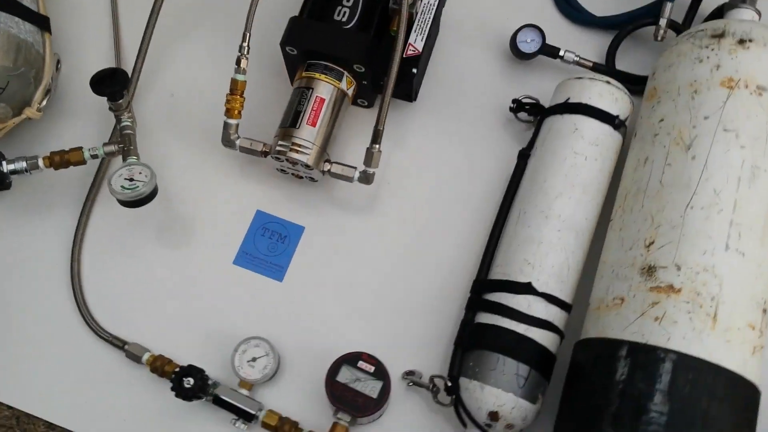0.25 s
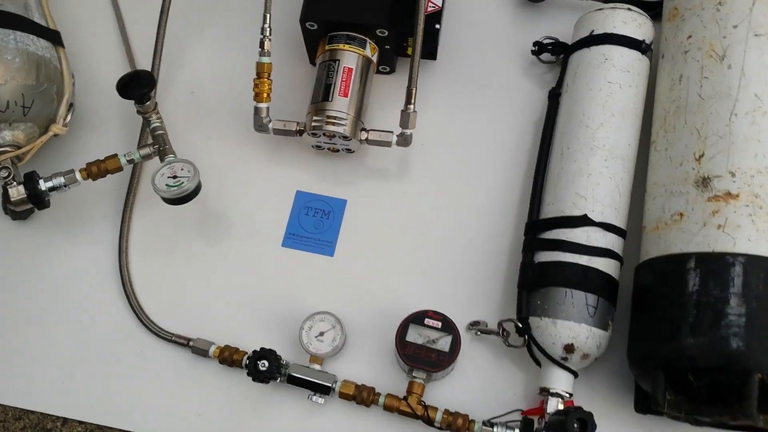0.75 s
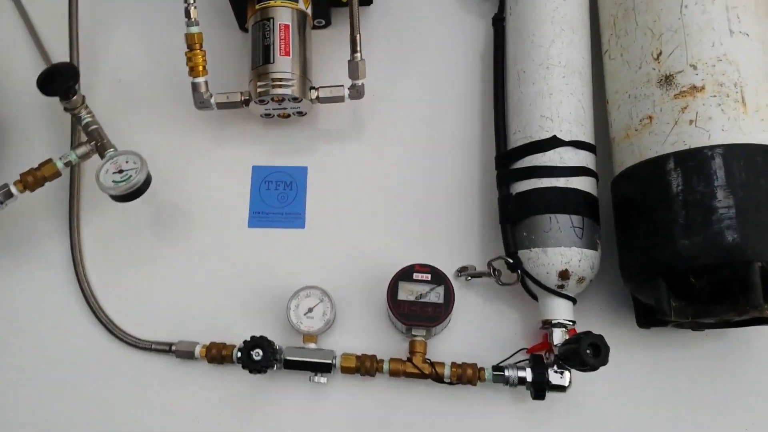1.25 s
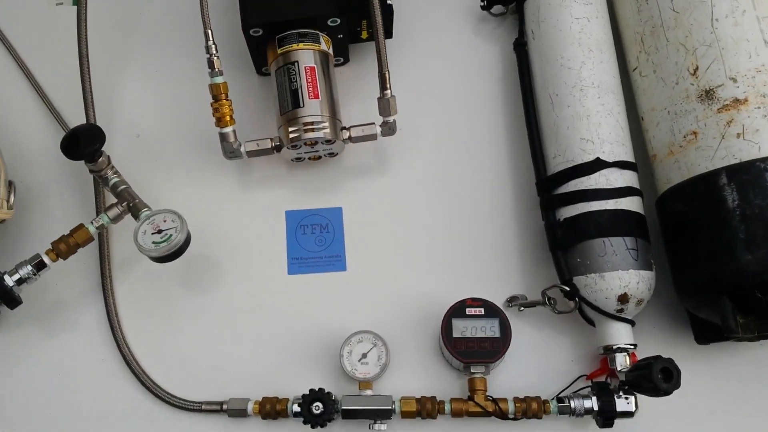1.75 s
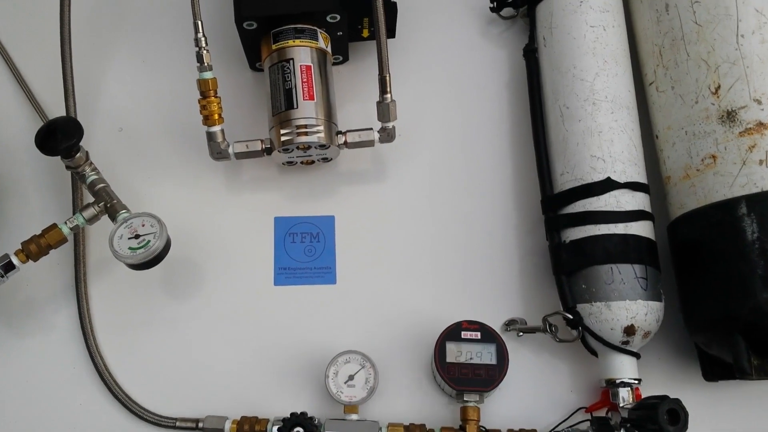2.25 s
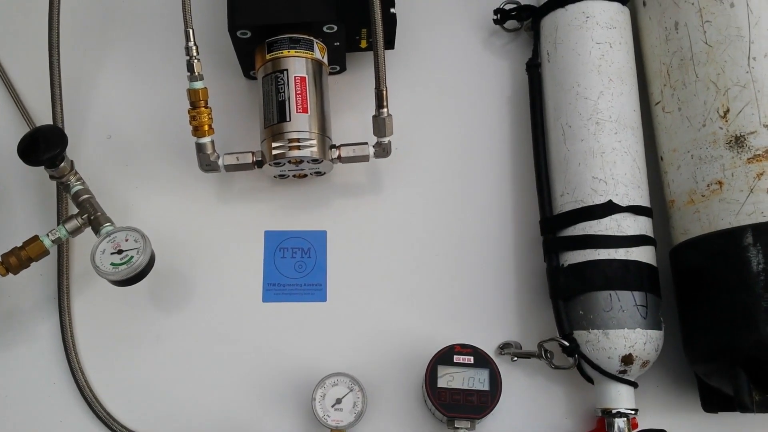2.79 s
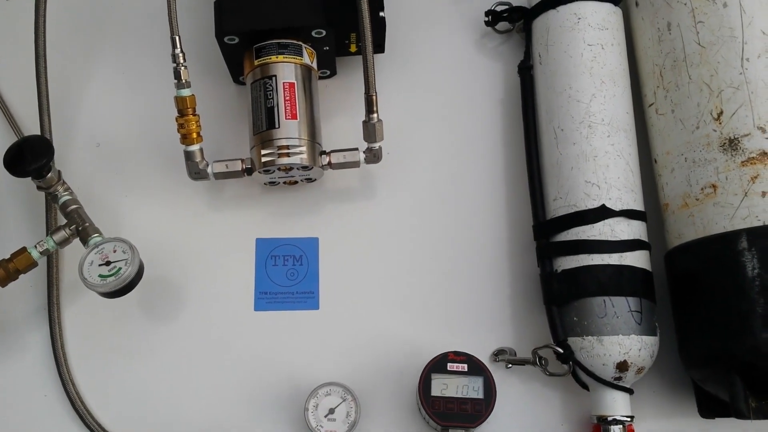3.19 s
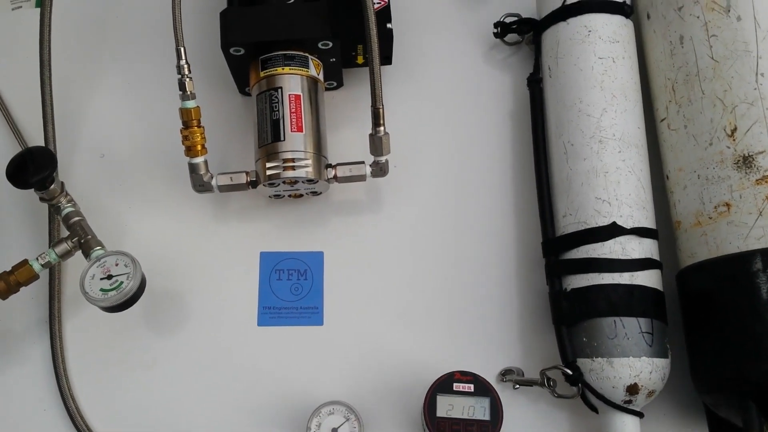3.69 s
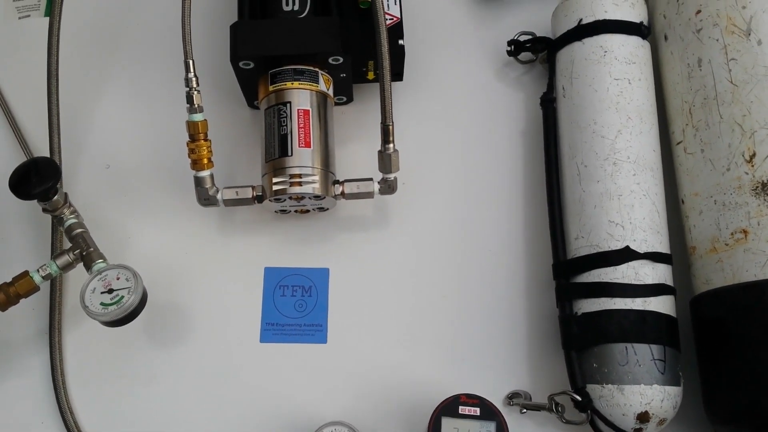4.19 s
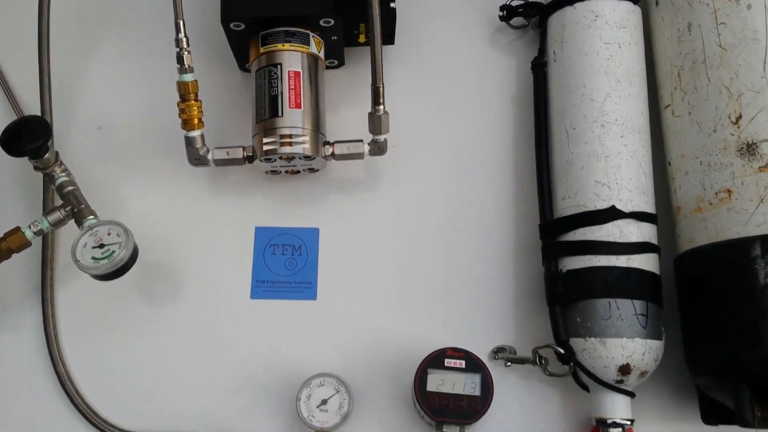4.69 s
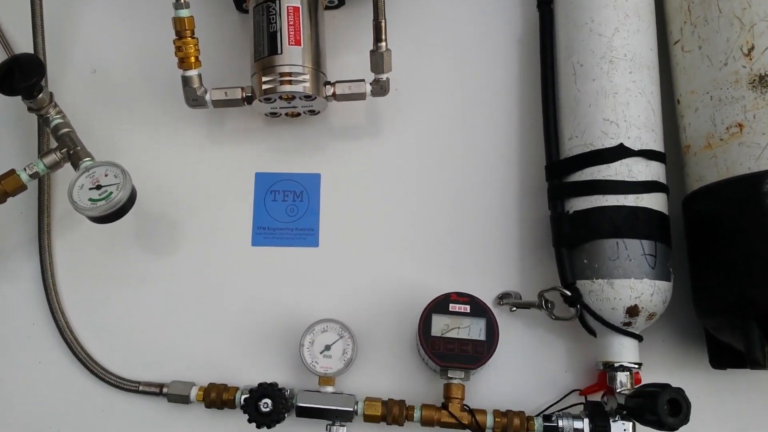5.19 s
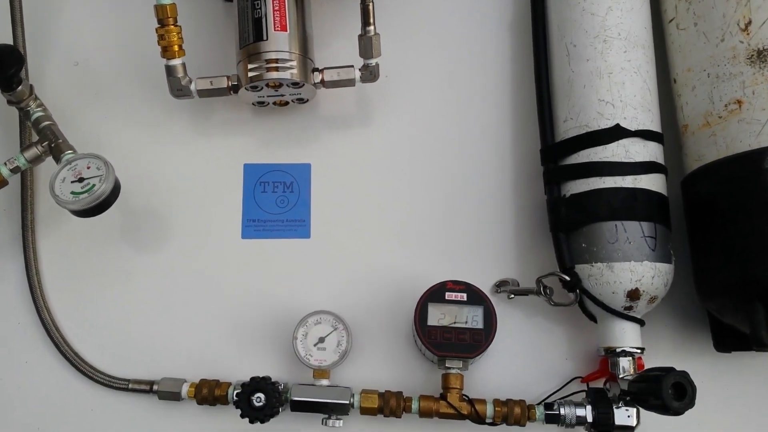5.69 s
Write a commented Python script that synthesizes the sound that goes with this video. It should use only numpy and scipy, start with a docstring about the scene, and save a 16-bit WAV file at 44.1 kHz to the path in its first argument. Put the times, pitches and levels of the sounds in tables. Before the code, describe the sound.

Seven two-part blasts of escaping air, about 0.9 seconds apart, heard close in stereo. A muffler gushes for about 0.15 seconds, the piston lands with a hard crack and tiny bounce, then a crisper puff answers and trails away as narrow, whistly hiss. Between them remain a quiet, high air leak, low background rumble and a faint early hum. Light rustles occur in the first second; little room echo.

```python
"""An air-driven gas booster makes seven strokes on a bench below a hand-held stereo camera.
From the start a fitting leaks shaped hiss over distant rumble; brief band-noise rustles and two faint tones
come early, and a sine hum swells and fades. In each stroke a pilot pin ticks and rings the cylinder, the spool
leaks, slams with a thud and the muffler roars in coloured noise, the piston lands and bounces as cracks, knocks
and thuds, then a sharp puff of noise answers and a narrow-band bleed dies away."""
import sys
import numpy as np
from scipy import signal
from scipy.fft import rfft, irfft, next_fast_len
from scipy.io import wavfile
from scipy.ndimage import uniform_filter1d

SR = 44100
rng = np.random.default_rng(int(sys.argv[2]) if len(sys.argv) > 2 else 0)


def unload_audio(sound):
    """Save the sound as a 16-bit wav file, at the path given as the first command line argument."""
    columns = np.transpose(np.atleast_2d(sound))
    # keep every value between -1 and 1, then stretch to whole-number steps
    steps = np.round(np.clip(columns, -1, 1) * 32767)
    wavfile.write(sys.argv[1], SR, steps.astype(np.int16))


N = 262042
T = np.arange(N) / SR
FFT_LENGTH = next_fast_len(N)
HZ = np.fft.rfftfreq(FFT_LENGTH, 1 / SR)

# Noise colours: pitch_hz, level_db (relative, per Hz)
RUMBLE_COLOUR = [(20, -31), (40, -13), (80, -4.5), (130, -13.5), (220, -16.5), (450, -19), (800, -19.5),
                 (1300, -24.5), (2200, -35), (4000, -50), (6000, -63)]
LEAK_COLOUR = [(880, -44), (1500, -18), (2130, -18.5), (3010, -17), (4810, -15.5), (5110, -9), (5740, -9.5),
               (6460, -5), (7260, -10), (11900, -14.5), (15600, -29)]
SNAP_COLOUR = [(150, -9), (350, -1), (1300, -3), (2000, -13), (3200, -13), (6000, -20), (15600, -40)]
PUFF_COLOUR = [(59, -61.5), (100, -41), (713, -8), (1160, -13), (1430, -4), (1660, -17), (2480, -7.5),
               (3070, -30), (3630, -41), (6160, -8), (7770, 2), (10700, -4), (15600, -12.5)]
BLEED_COLOUR = [(88, -50.5), (150, -22.5), (428, -18.5), (530, -24.5), (608, -20.5), (1300, -15.5),
                (1700, -17), (4160, -6.5), (4590, -2), (5050, -7.5), (5360, -3), (8380, -8.5), (15600, -28)]
CRACK_COLOUR = [(300, -3.5), (1000, -10.5), (3500, 1), (6500, 11.5), (10000, -8), (15600, -14.5)]
KNOCK_COLOUR = [(200, -2), (500, -2), (800, 1), (2000, 0.5), (4000, -6.5), (15600, -40)]
SLIDE_COLOUR = [(150, -6), (400, 2.5), (1200, -6), (2500, -8.5), (5000, -9), (9000, -4), (15600, -22)]
SURGE_COLOUR = [(300, -30), (800, -17.5), (2500, -24), (3500, -12.5), (4500, -5.5), (5050, 3), (5700, -6),
                (9000, -13), (15600, -43)]
VENT_COLOUR = [(35, -71), (60, -34), (216, -16), (522, -19), (1320, -14.5), (1600, -16), (4760, -3),
               (5230, -3), (7410, -1), (8720, -4), (10300, -8.5), (14500, -16), (15600, -20)]
HOLLOW_COLOUR = [(400, -29.5), (650, -10), (750, -2), (880, -4), (1100, -16.5), (1410, -3.5), (1650, -19),
                 (3000, -49)]
# Resonances added to a colour: pitch_hz, width_hz (at half the boost in dB), boost_db
FITTING_PEAKS = [(5060, 170, 2.1), (6370, 390, 4.8), (8200, 610, 5.2), (11400, 200, 1.6), (11370, 430, 5.3)]
NOZZLE_PEAKS = [(6870, 490, 7.1), (8100, 210, 3.1), (9040, 140, 2.4), (10580, 370, 6.3)]
PASSAGE_PEAKS = [(1980, 450, 5.9), (4560, 28, 3.1), (4720, 95, 5.8), (5430, 130, 4.5), (6120, 140, 5.5),
                 (7000, 69, 1.9), (8560, 290, 9.6)]
MUFFLER_PEAKS = [(720, 12, 1.3), (1400, 94, 5.5), (2110, 410, 3), (2560, 93, 2.9), (3180, 170, 5.3),
                 (4690, 170, 6.2), (6000, 190, 3.3), (7230, 220, 1.7), (8770, 290, 4.7)]
# Stereo shading by the camera body: pitch_hz, left_minus_right_db
PUMP_SHADE = [(300, 0), (800, 1), (2500, -0.5), (3500, -1.5), (4700, -4), (6200, 2.5), (7000, -4),
              (8000, -9.5), (9000, -16), (10500, -9.5), (13000, -16.5), (15500, -11)]
LEAK_SHADE = [(500, 3), (4000, 1), (5200, 3.5), (6300, 5.5), (7200, -4), (8200, -11), (10000, -10),
              (12000, -11), (14000, -10)]
# Likeness of the two ports: pitch_hz, correlation (0 to 1)
PORT_LIKENESS = [(30, 1), (150, 0.9), (700, 0.77), (1400, 0.61), (2500, 0.75), (5000, 0.44), (15000, 0.24)]
# Level curves before flutter: time_s, level_db
HUM_CURVE = [(0, -67.5), (.75, -73), (.95, -65.5), (1.5, -62), (2.7, -72), (4.2, -80)]
LEAK_CURVE = [(.15, -51.5), (.95, -55), (1.85, -53.5), (2.75, -57), (3.65, -53.5), (4.55, -57.5),
              (5.5, -57)]
# Rustles and ticks close to the camera: start_s, level_db, length_s, centre_hz, width_octaves
RUSTLES = [(0.035, -56.5, .041, 796, 1.25), (0.045, -49, 0.031, 5200, 1.7), (0.151, -57.5, .005, 1390, 1.2),
           (0.192, -58.5, 0.12, 1100, 2.5), (0.249, -48, 0.037, 5800, 0.93), (0.729, -66, 0.012, 650, 0.36),
           (0.81, -60, .004, 2220, 0.99), (0.833, -55, .0068, 730, 1.15), (1.016, -55.5, 0.007, 2300, 1.6),
           (1.05, -61.5, 0.032, 790, 2.4)]
# Faint whistles: start_s, length_s, level_db
WHISTLES = [(.81, .03, -55), (1.077, 0.061, -57)]
# Strokes: muffler_opens_s, vent_db, slam_db, piston_lands_after_s, landing_crack_db,
# bounce_crack_db, puff_db, tick_db
STROKES = [(.3125, -19, -28, 0.15, -17, -30, -19.5, -53), (1.179, -24, -44, 0.16, -33, -41, -20, -64),
           (2.0576, -21.5, -26.5, 0.15, -32, -37, -20.5, -50.5),
           (2.953, -23.5, -30.5, 0.16, -24, -27, -19, -56),
           (3.8555, -21, -27, 0.14, -22, -23, -19.5, -52.5),
           (4.774, -23, -30.5, 0.15, -20.5, -26, -20, -56),
           (5.709, -22.5, -29.5, .1503, -21, -24, -18.5, -56)]

# Stereo and close echoes from bench, tanks and camera body
LEFT_LAG_S, ECHO_DB, ECHO_T60_S = 0.0002, -15, 0.039
DRIFT_S = 1.8  # the hand-held camera drifts to a new set of echoes and back
TOP_HZ = 15700
# Background
RUMBLE_DB, RUMBLE_FADE_DB_PER_S = -60, -0.73
HUM_HZ, WHISTLE_HZ = 158, 5200
# Pilot: the pin ticks ahead of the vent, earlier by LEAD_GROWTH s per s as the piston slows
TICK_LEAD_S, LEAD_GROWTH, PUFF_AFTER_S = .1135, .0047, .1972  # both times from the muffler opening
CYLINDER_HZ, CYLINDER_T60_S = 727, .17
RING_OVER_TICK_DB, BLEED_UNDER_PUFF_DB, PUFF_THUD_DB = 2, -6.5, -40.5
# Piston
BOUNCE_AFTER_S = .016  # after the landing
LANDING_KNOCK_DB, LANDING_THUD_DB, BOUNCE_KNOCK_DB, BOUNCE_THUD_DB = -46, -39, -36.5, -39.5
# Exhaust; the sag is the drive pressure falling
SURGE_DB, SLIDE_UNDER_SLAM_DB, SAG_DB_PER_S = -21.5, -8.5, -11.5
# Hollow tone relative to its flow, weaker with each stroke
HOLLOW_VENT_DB, HOLLOW_PUFF_DB, HOLLOW_FADE_DB_PER_S = -19.5, -15, -1.4


def undb(db):
    """Gain of a level in dB."""
    return 10 ** (np.asarray(db) / 20)


def across(table):
    """Read a pitch table at every frequency, straight between points on a log pitch scale."""
    hz, value = np.transpose(table)
    return np.interp(np.log(HZ + 1), np.log(hz), value)


def bounces():
    """Comb of the straight path and a dense random spray of echoes, with its broad colour flattened."""
    t = np.arange(int(.03 * SR)) / SR
    path = undb(ECHO_DB - 60 * t / ECHO_T60_S) * rng.standard_normal(len(t))
    path[0] = 1  # straight path
    comb = rfft(path, FFT_LENGTH)
    broad_power = uniform_filter1d(np.abs(comb) ** 2, size=N // 60)
    return comb / np.sqrt(broad_power)


def hiss(colour, peaks=(), shade=PUMP_SHADE, lag_s=LEFT_LAG_S):
    """Turbulent noise at both ports, mono rms 1: partly shared, late and shaded on the left, combed by echoes."""
    db = across(colour)
    for hz, width, boost in peaks:
        db = db + boost / (1 + (2 * (HZ - hz) / width) ** 2)

    right, other = rfft(rng.standard_normal((2, FFT_LENGTH)))
    alike = np.clip(across(PORT_LIKENESS), 0, 1)
    left = alike * right + np.sqrt(1 - alike ** 2) * other
    left = left * np.exp(-2j * np.pi * HZ * lag_s)

    left_share = 1 / (1 + undb(-2 * across(shade)))  # share of the power
    apart = np.clip((HZ / 2400) ** 2, 0, 1)  # long waves reach both ports by the same paths
    left = left * (1 - apart + apart * bounces()) * np.sqrt(left_share)
    right = right * (1 - apart + apart * bounces()) * np.sqrt(1 - left_share)

    noise = irfft(undb(db) * np.array([left, right]), FFT_LENGTH)[:, :N]
    return noise / np.sqrt(np.mean(noise.mean(0) ** 2))


def drifting(*colour):
    """Hiss whose echo comb changes as the camera moves: two combs take turns."""
    turn = np.pi * T / DRIFT_S
    return np.cos(turn) * hiss(*colour) + np.sin(turn) * hiss(*colour)


def flutter(rate_hz, spread_db):
    """Unsteady gain: random dB levels, rate_hz of them a second, joined by straight ramps."""
    step = int(SR / rate_hz)
    held = np.repeat(rng.standard_normal(N // step + 1), step)
    return undb(spread_db * uniform_filter1d(held, step)[:N])


def burst(at, rise_s, hold_s, t60_s):
    """Flow envelope that swells exponentially up to a moment, holds, then dies away exponentially."""
    out = np.zeros(N)
    first = max(int((at - 2 * rise_s) * SR), 0)
    heard = slice(first, int((at + hold_s + 2 * t60_s) * SR))
    t = T[heard] - at
    swell_db = np.minimum(60 * t / rise_s, 0)
    fade_db = 60 * np.maximum(t - hold_s, 0) / t60_s
    out[heard] = undb(swell_db - fade_db)
    return out


def ring(at, hz, t60_s):
    """One damped mode struck at a moment: a sine that decays exponentially."""
    t = np.maximum(T - at, 0)
    return np.sin(2 * np.pi * hz * t) * undb(-60 * t / t60_s)


def thud(at, hz, width_s):
    """A pressure jolt through the bench: a short low cosine in a bell window, with no lasting offset."""
    t = T - at
    window = np.exp(-(t / width_s) ** 2)
    jolt = np.cos(2 * np.pi * hz * t + 0.89) * window
    return jolt - window * jolt.sum() / window.sum()


def surroundings():
    """Distant rumble as low noise with a broad 80 Hz drone, and a sine hum that swells and fades."""
    hum_level = undb(np.interp(T, *np.transpose(HUM_CURVE))) * flutter(5.83, 2.3)
    hum = hum_level * np.sqrt(2) * np.sin(2 * np.pi * HUM_HZ * T)
    rumble_level = undb(RUMBLE_DB + RUMBLE_FADE_DB_PER_S * T) * flutter(2.03, 0.8)
    drone = [(81, 7.6, 3.3)]
    rumble_shade = [(20, 0.045), (4000, 0.57)]
    return rumble_level * hiss(RUMBLE_COLOUR, drone, rumble_shade, 0) + hum


def hands():
    """Brief grainy rustles: fluttering noise, each burst in its own band."""
    out = 0
    for at, level_db, length_s, hz, octaves in RUSTLES:
        edges = hz * 2 ** (np.array([-.5, .5]) * octaves)
        band = signal.butter(2, edges, "band", fs=SR, output="sos")
        mid, side = signal.sosfilt(band, rng.standard_normal((2, SR * 3 // 2)))
        rub = np.pad([mid + 0.83 * side, mid - 0.45 * side], ((0, 0), (0, N - len(mid))))
        envelope = burst(at, length_s + .005, length_s, 2 * length_s + .03)
        out = out + undb(level_db) * envelope * rub / mid.std()
    return out * flutter(140, 2.6)


def whistles():
    """Two short tones of steady pitch that swell in and fade, slightly late on the left."""
    swell = sum(undb(level_db) * burst(at, .04, length_s, .08) for at, length_s, level_db in WHISTLES)
    lag_s = np.array([[LEFT_LAG_S / 4], [0]])
    return swell * flutter(80, 1.2) * np.sin(2 * np.pi * WHISTLE_HZ * (T - lag_s))


def leak():
    """A thin hiss all along: turbulent air from a fitting, coloured by its resonances."""
    level_db = np.interp(T, *np.transpose(LEAK_CURVE))
    return undb(level_db) * flutter(18, 0.41) * drifting(LEAK_COLOUR, FITTING_PEAKS, LEAK_SHADE)


def pilot():
    """The pin snaps and the cylinder rings; later pilot air puffs out and a narrow bleed sings in the passages."""
    snap, rings, puff, bleed, hollow, low = 0, 0, 0, 0, 0, 0
    for opens, *_, puff_db, tick_db in STROKES:
        tick = opens - TICK_LEAD_S - LEAD_GROWTH * opens
        snap = snap + undb(tick_db) * burst(tick + .001, .004, .003, .035)
        # the ring builds up over some cycles after the snap
        build_up = burst(tick + 0.016, 0.033, 9, 1)
        struck = build_up * ring(tick, CYLINDER_HZ, CYLINDER_T60_S)
        rings = rings + undb(tick_db + RING_OVER_TICK_DB) * struck

        at = opens + PUFF_AFTER_S
        opening = undb(puff_db) * burst(at + .001, .008, 9, 1)
        puff = puff + opening * burst(at, .03, .022, 0.21)
        hollow_gain = undb(HOLLOW_PUFF_DB + HOLLOW_FADE_DB_PER_S * at)
        hollow = hollow + hollow_gain * opening * burst(at, .03, 0.016, 0.24)
        # two overlaid decays: the bleed dies away faster late on
        bleed_shape = burst(at + 0.0022, 0.047, 0.028, 0.55) * burst(at + .002, 0.047, 0.19, 0.67)
        bleed = bleed + undb(puff_db + BLEED_UNDER_PUFF_DB) * bleed_shape
        low = low + undb(PUFF_THUD_DB) * thud(at + 0.00092, 184, 0.0045)

    puffs = puff * flutter(200, 1.0) * drifting(PUFF_COLOUR, NOZZLE_PEAKS) + hollow * hiss(HOLLOW_COLOUR)
    ticks = snap * hiss(SNAP_COLOUR) + rings * flutter(60, 1.3)
    bleeds = bleed * flutter(50, 0.99) * drifting(BLEED_COLOUR, PASSAGE_PEAKS)
    return ticks + puffs + bleeds + low


def piston():
    """The piston lands on the end cap and bounces once; each bump is a short crack, a duller knock and a thud."""
    crack, knock, low = 0, 0, 0
    for opens, _, _, lands_after_s, landing_db, bounce_db, *_ in STROKES:
        lands = opens + lands_after_s
        landing = lands, landing_db, LANDING_KNOCK_DB, LANDING_THUD_DB
        bounce = lands + BOUNCE_AFTER_S, bounce_db, BOUNCE_KNOCK_DB, BOUNCE_THUD_DB
        for at, crack_db, knock_db, thud_db in (landing, bounce):
            crack = crack + undb(crack_db) * burst(at + .001, .004, .002, .035)
            knock = knock + undb(knock_db) * burst(at + .001, .004, .003, .05)
            low = low + undb(thud_db) * thud(at + 0.0025, 150, 0.0033)
    return crack * hiss(CRACK_COLOUR) + knock * hiss(KNOCK_COLOUR) + low


def exhaust():
    """The spool leaks as it slides and slams; the muffler surges, roars until the piston lands and chokes off."""
    vent, hollow, surge, slide, low = 0, 0, 0, 0, 0
    for at, vent_db, slam_db, lands_after_s, *_ in STROKES:
        slide = slide + undb(slam_db + SLIDE_UNDER_SLAM_DB) * burst(at - .013, 0.016, 0.0092, .02)
        low = low + undb(slam_db) * thud(at - .004, 177, 0.0041)
        surge = surge + undb(SURGE_DB) * burst(at + .002, .025, 0.0074, 0.11)

        opening = burst(at + .002, .025, 9, 1)
        sag = undb(SAG_DB_PER_S * np.maximum(T - at, 0))
        # one choke starts just after the landing, a steeper one at a set time
        choke = burst(at, .01, lands_after_s + 0.0048, 0.58) * burst(at, .01, 0.18, 0.22)
        flow = undb(vent_db) * opening * sag * np.where(T < at, 1, choke)
        vent = vent + flow
        hollow = hollow + undb(HOLLOW_VENT_DB + HOLLOW_FADE_DB_PER_S * at) * flow

    sputter = flutter(60, .8) * flutter(900, 1.3)
    roar = sputter * vent * drifting(VENT_COLOUR, MUFFLER_PEAKS) + hollow * hiss(HOLLOW_COLOUR)
    return roar + surge * drifting(SURGE_COLOUR) + slide * hiss(SLIDE_COLOUR) + low


def scene():
    """All sources at the two ports."""
    booster = exhaust() + piston() + pilot()
    return booster + leak() + surroundings() + hands() + whistles()


def record(dry):
    """The microphone sheds the deepest bass; the recorder cuts the top steeply."""
    thin = signal.sosfilt(signal.butter(2, 35, "high", fs=SR, output="sos"), dry)
    return signal.sosfilt(signal.ellip(10, .2, 75, TOP_HZ, fs=SR, output="sos"), thin)


dry = scene()
out = record(dry)
unload_audio(out)
```